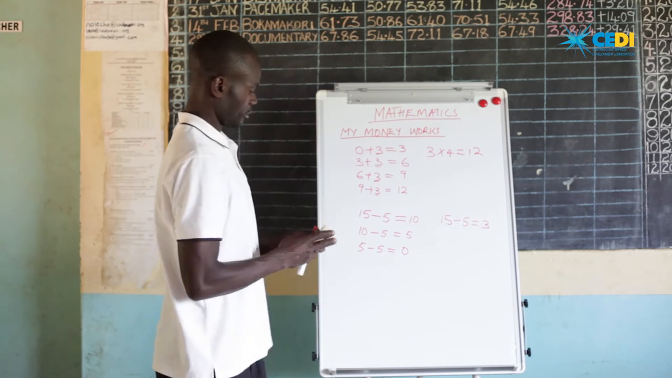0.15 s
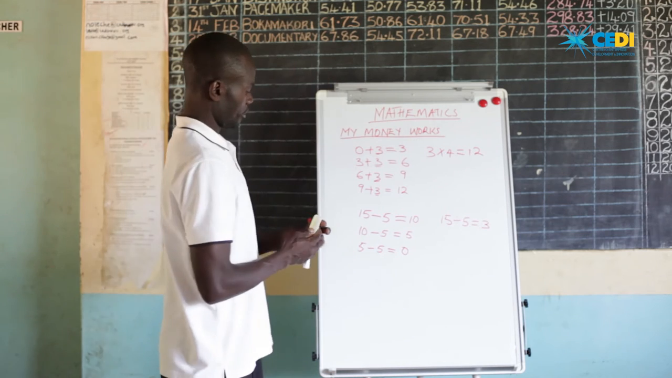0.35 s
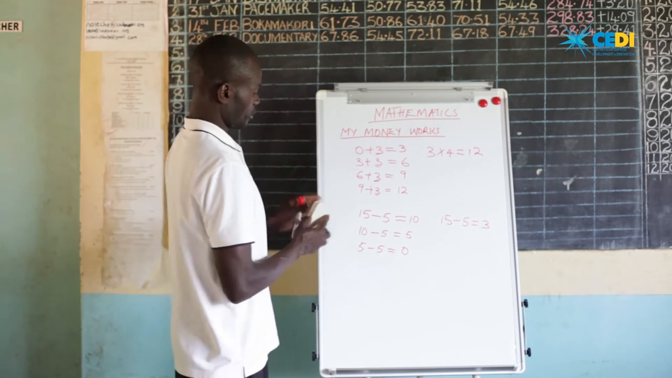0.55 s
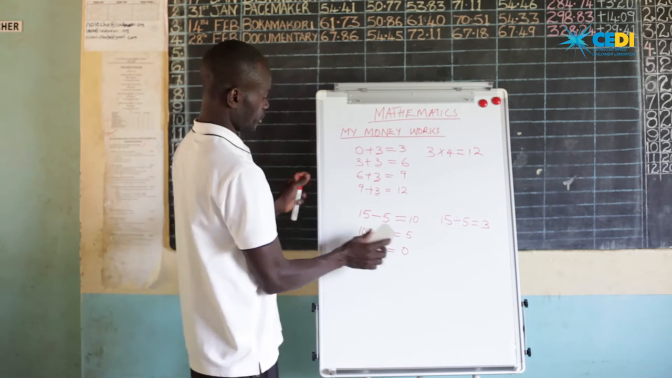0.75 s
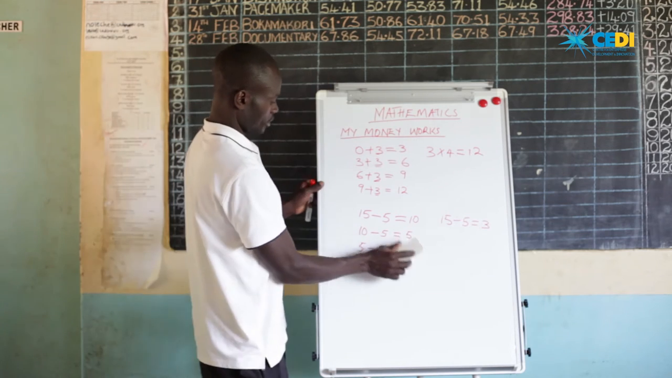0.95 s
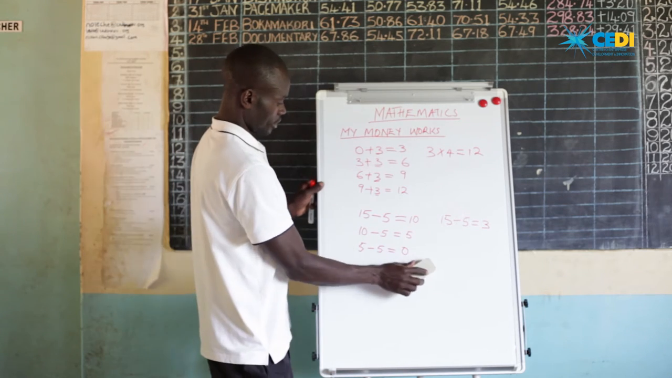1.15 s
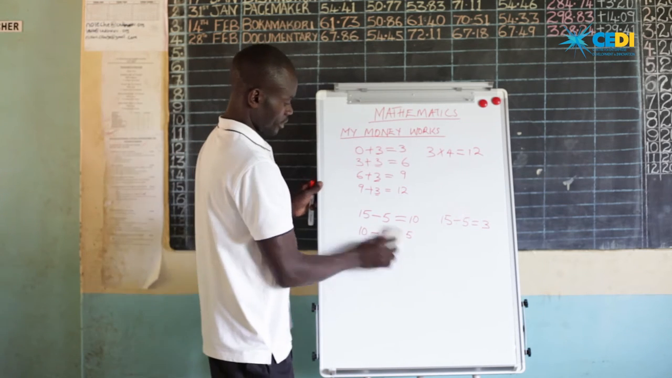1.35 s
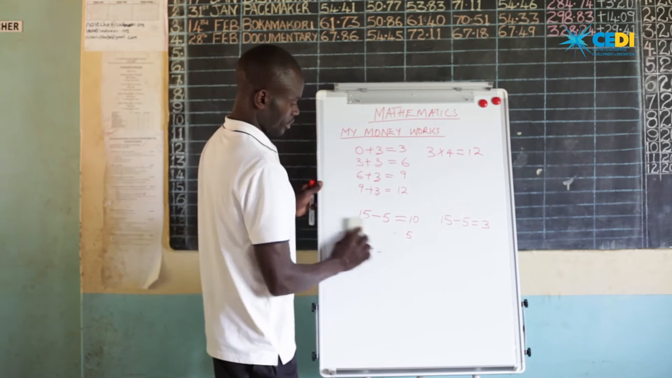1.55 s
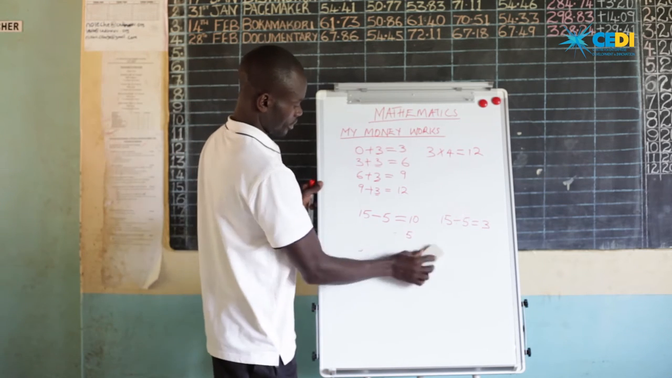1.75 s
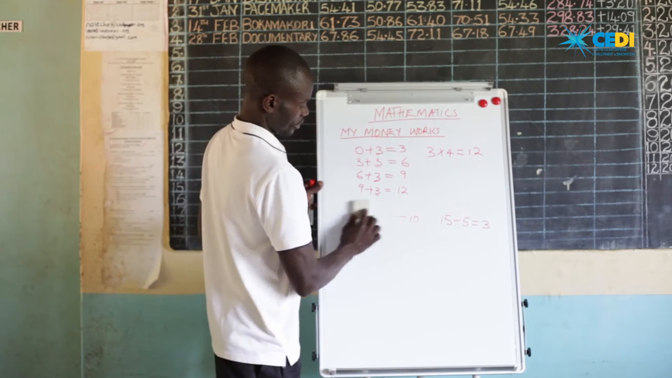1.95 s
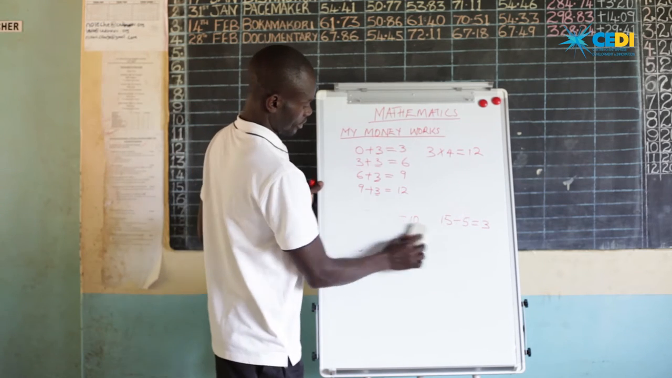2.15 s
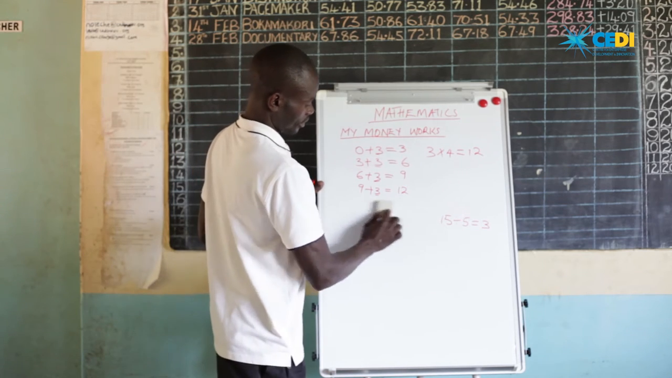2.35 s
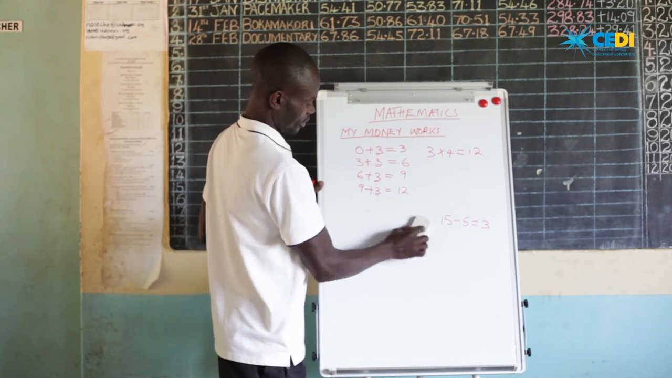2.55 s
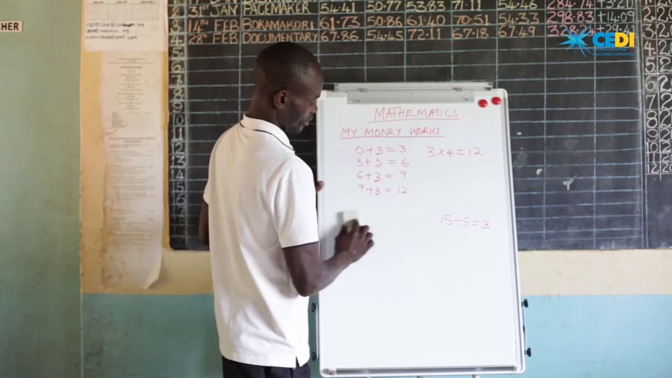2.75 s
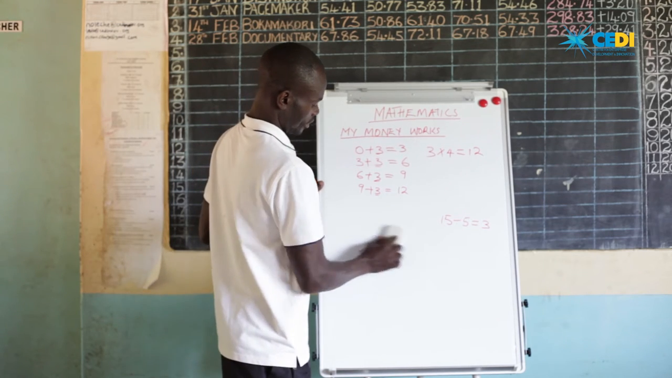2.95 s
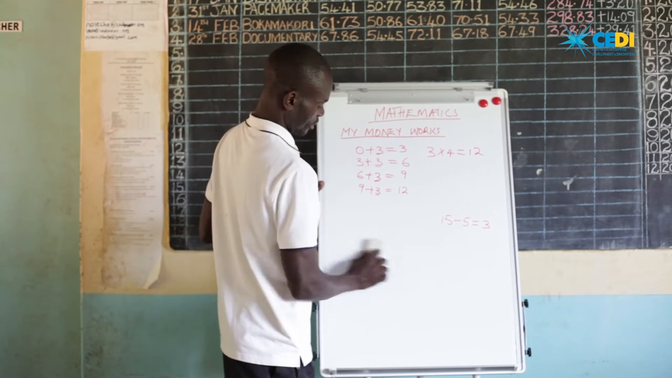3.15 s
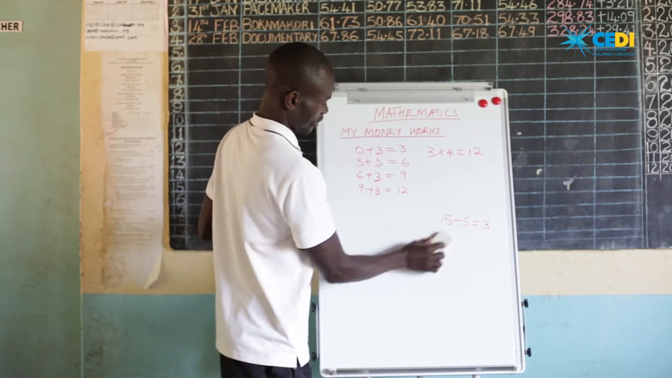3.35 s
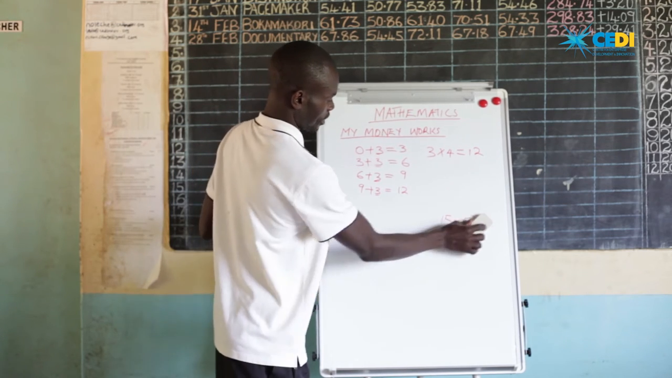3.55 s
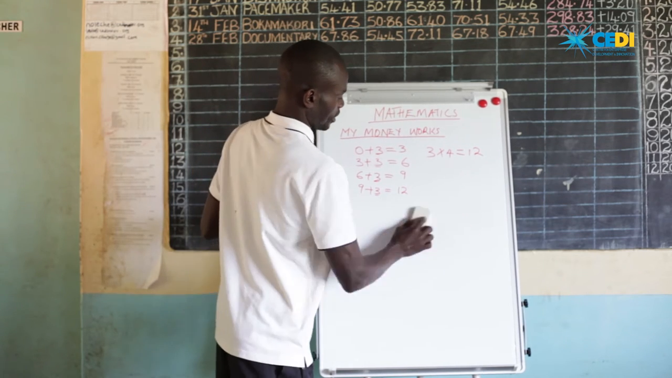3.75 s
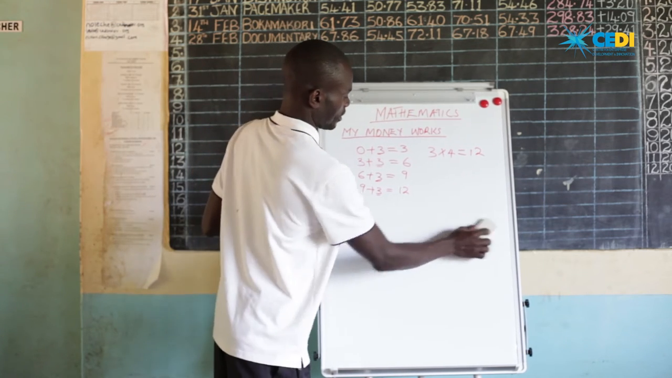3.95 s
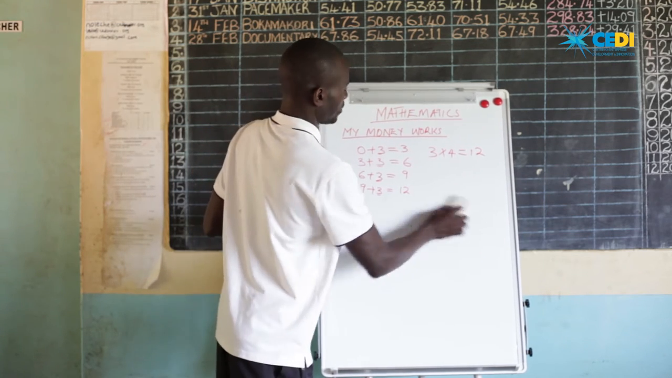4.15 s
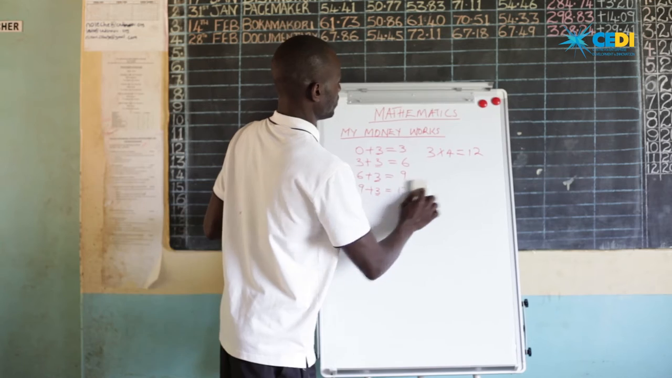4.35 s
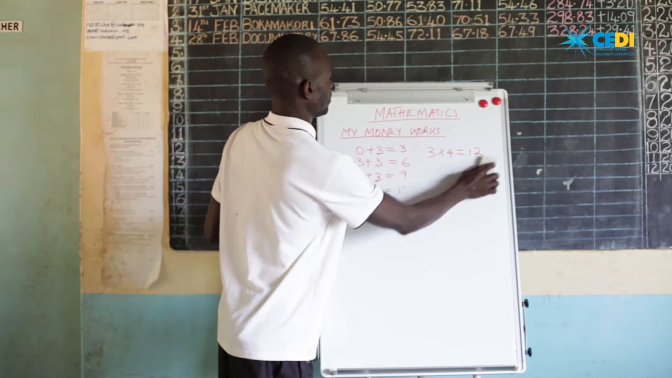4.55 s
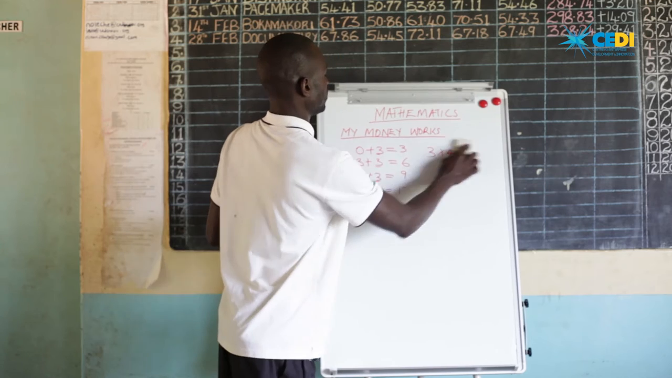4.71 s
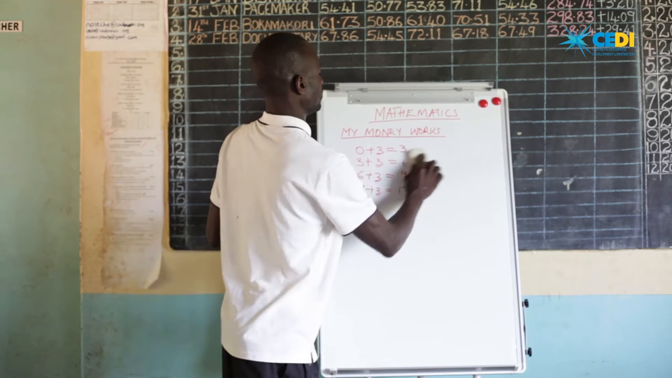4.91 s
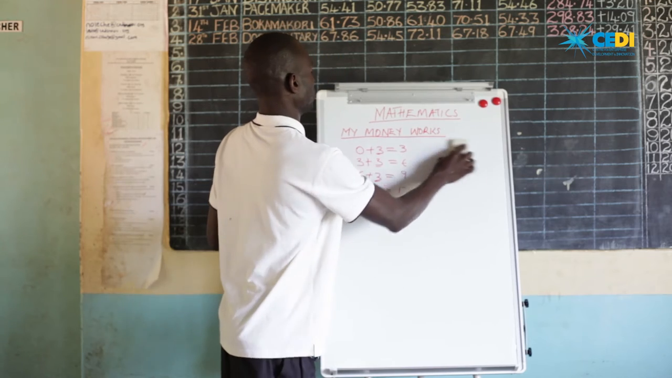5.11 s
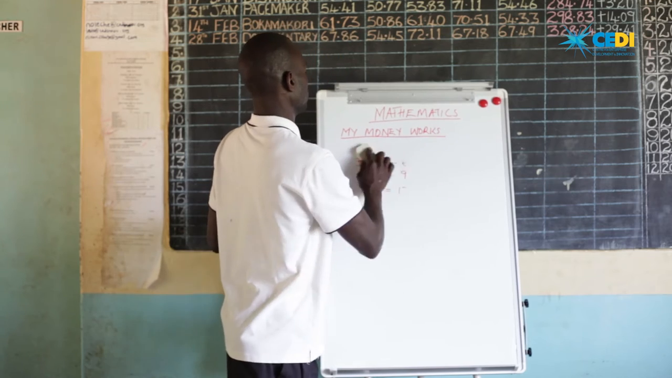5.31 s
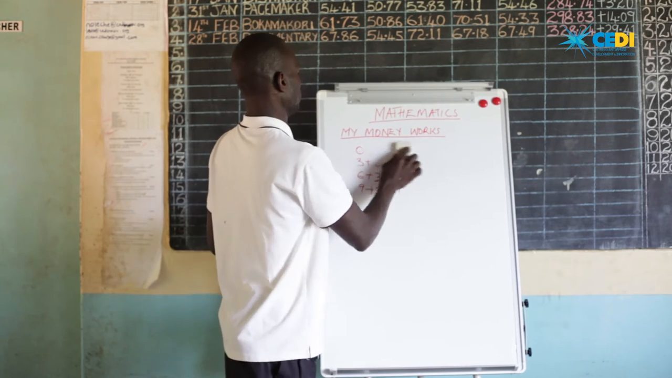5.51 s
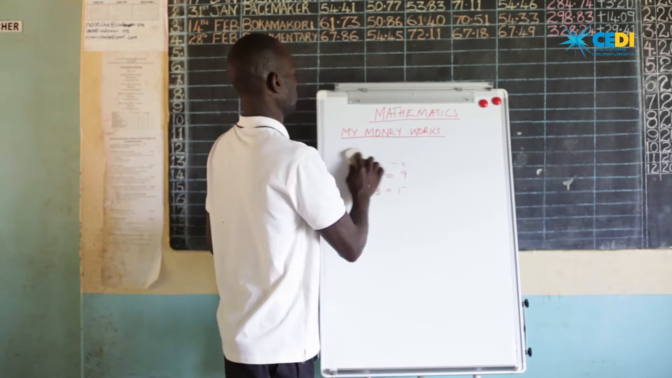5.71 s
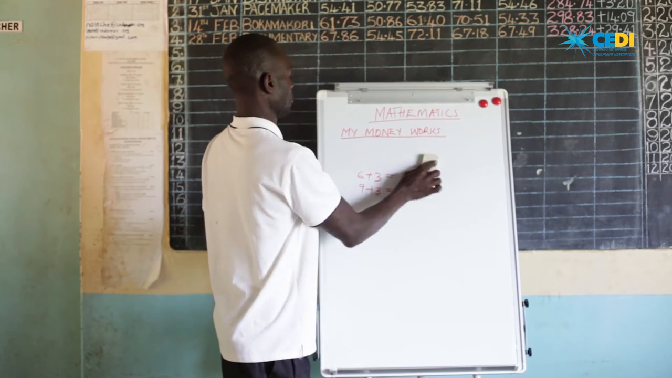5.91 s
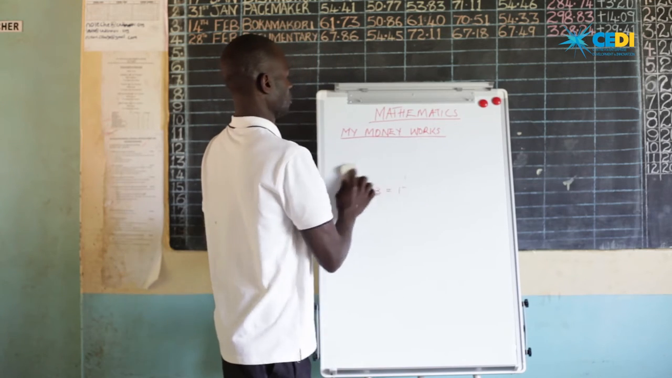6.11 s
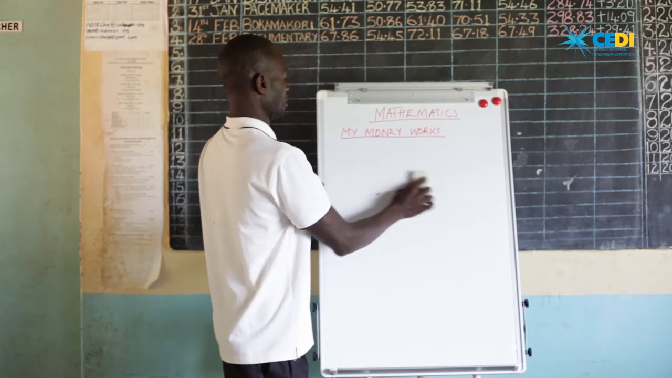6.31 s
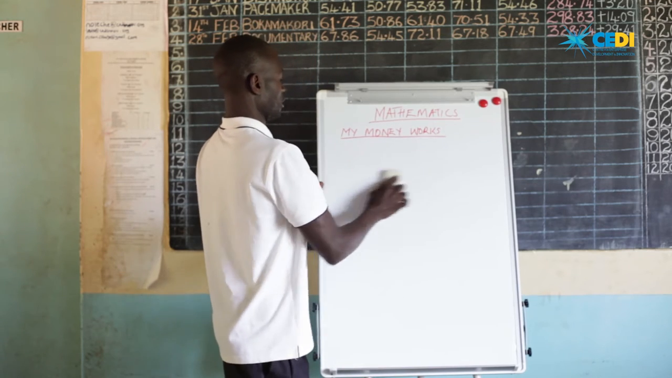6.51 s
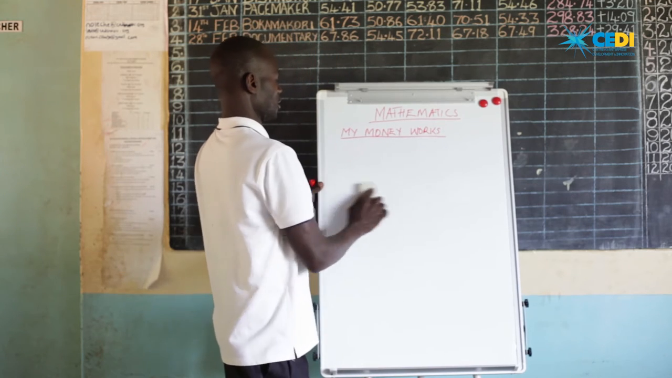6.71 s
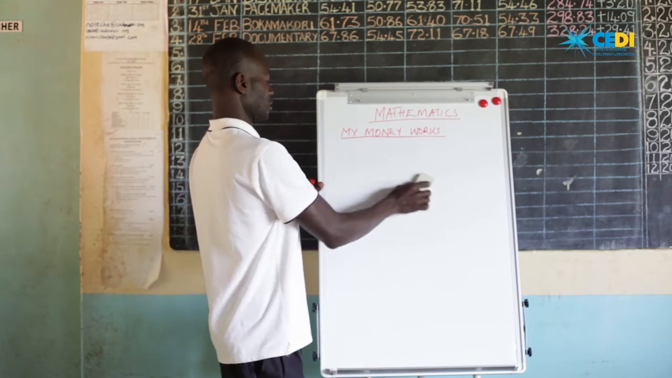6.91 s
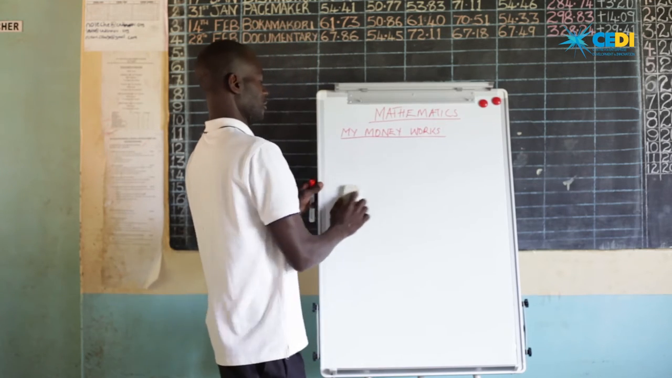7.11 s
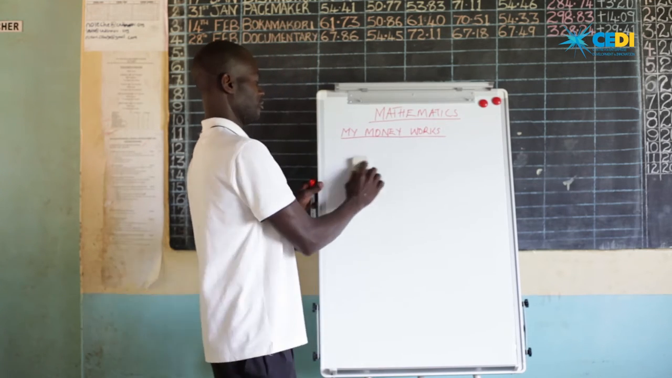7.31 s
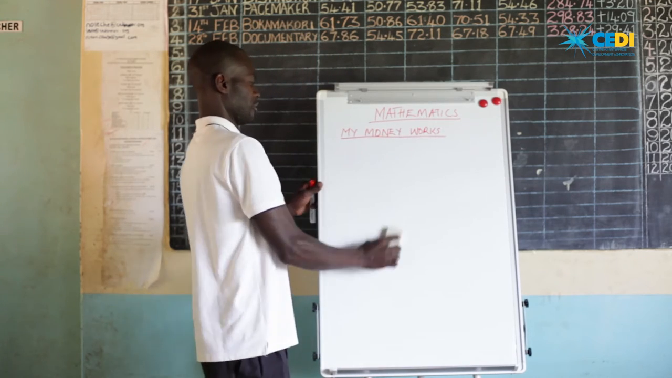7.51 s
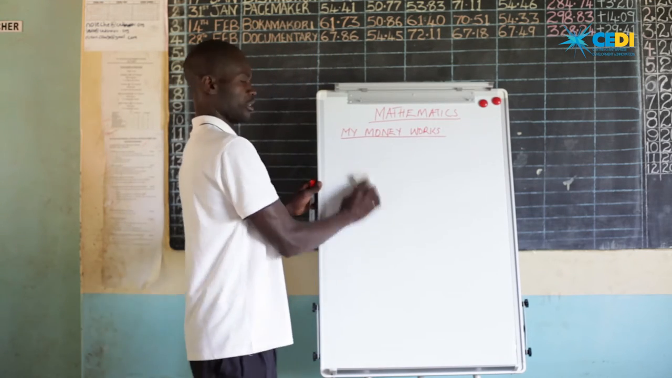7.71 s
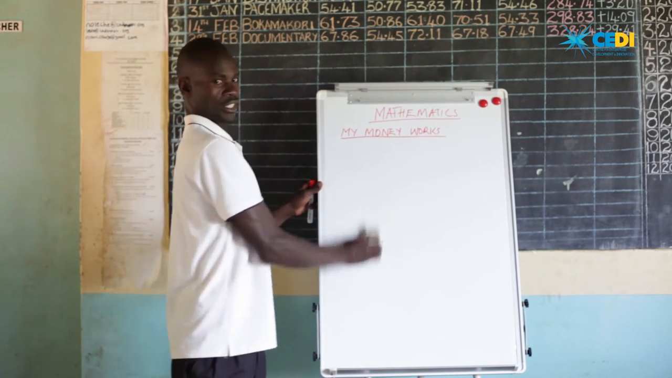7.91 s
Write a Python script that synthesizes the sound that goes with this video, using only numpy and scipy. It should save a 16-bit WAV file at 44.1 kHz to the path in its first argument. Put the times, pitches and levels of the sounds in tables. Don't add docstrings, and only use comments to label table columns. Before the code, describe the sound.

Close stereo view of a whiteboard being wiped. First there is only faint room rumble, hum, light rustling and one crisp plastic click. After about a second the pad goes to work, a steady dry hiss and scrape broken by irregular short squeaks, some clear and gliding, others hoarse. Dull easel thuds and knocks come with the shoves. Bare walls add a short live echo until the rubbing eases at the end.

```python
import sys
import numpy as np
from scipy import signal
from scipy.fft import rfft, irfft, next_fast_len
from scipy.io import wavfile
from scipy.ndimage import uniform_filter1d

SR = 44100
rng = np.random.default_rng(int(sys.argv[2]) if len(sys.argv) > 2 else 0)


def materialize(psi):
    bounded = np.clip(np.atleast_2d(psi).T, -1, 1)
    quanta = np.round(bounded * 32767).astype(np.int16)
    wavfile.write(sys.argv[1], SR, quanta)


def linear_from_db(decibels):
    return 10 ** (np.asarray(decibels, float) / 20)


N = 355874


def evened(x):
    return x / np.sqrt(np.mean(x ** 2) + 1e-20)


def smooth_twice(x, first, second):
    return evened(uniform_filter1d(uniform_filter1d(x, first), second))


def read(points, hz):
    f, value = np.transpose(points)
    return np.interp(np.log(hz + 1), np.log(f + 1), value)


def follow(rows, column):
    return np.interp(np.arange(N) / SR, [r[0] for r in rows], [r[column] for r in rows])


def add(mix, s, sound):
    part = mix[round(s * SR):][:len(sound)]
    part += sound[:len(part)]


def shape(x, gain):
    size = next_fast_len(N)
    return irfft(rfft(x, size) * gain(np.fft.rfftfreq(size, 1 / SR)), size)[..., :N]


def swells(s, db, rise_db_s, fall_db_s, idle_db):
    t = np.arange(0, N, 64) / SR
    late = t[:, None] - s
    peaks = linear_from_db(db - np.maximum(-late * rise_db_s, late * fall_db_s))
    gain = np.sqrt((peaks ** 2).sum(1) + linear_from_db(idle_db) ** 2)
    return np.interp(np.arange(N) / SR, t, gain)


# f/Hz, likeness [0 to 1]
LIKENESS = [(40, .8), (125, .75), (300, .86), (700, .75), (2400, .8), (7000, .86), (10000, .74),
            (14000, .25)]


def noise(spectrum, patchy_db):
    frames, hz = N // 256 + 5, np.fft.rfftfreq(1024, 1 / SR)
    a, b, c, d, patches = rng.standard_normal((frames, 513, 5)).T
    patches = evened(uniform_filter1d(uniform_filter1d(patches, 10, 0), 10, 1))
    same = read(LIKENESS, hz)[:, None]
    left = a + 1j * b
    right = same * left + np.sqrt(1 - same ** 2) * (c + 1j * d)
    z = np.array([left, right]) * linear_from_db(read(spectrum, hz)[:, None] + patchy_db * patches)
    return evened(signal.istft(z, nperseg=1024, noverlap=768)[1][:, :N])


# f/Hz, level/dB [per Hz]
QUIET_ROOM = [(12, -32), (20, 10.5), (59, 1.5), (119, -29), (275, -21), (354, -17), (601, -17.5),
              (1310, -27.5), (1830, -16.5), (4730, -23.5), (6430, -24), (10000, -29), (15700, -33)]


def quiet_room():
    return linear_from_db(-57.5) * noise(QUIET_ROOM, 1.8)


# f/Hz, level/dB [rms]
STEADY_TONES = [
    (50.5, -53),
    (74, -89),
    (113, -88),
    (360, -70),
]
# t/s, level/dB
HUM_DRIFT = [
    (0, -2.5),
    (2.5, -1.5),
    (5.2, -2),
    (8.07, -8),
]


def hum():
    t = np.arange(N) / SR
    wavers = smooth_twice(rng.standard_normal((len(STEADY_TONES), N)), 1200, 1200)
    total = np.zeros(N)
    for (hz, db), waver in zip(STEADY_TONES, wavers):
        total += np.sqrt(2) * linear_from_db(db + waver) * np.sin(2 * np.pi * hz * t + 0.17 * waver)
    return linear_from_db(follow(HUM_DRIFT, 1)) * total


# f/Hz, time to fall 60 dB [s]
ROOM_DECAY = [(250, 0.41), (1000, 0.64), (2000, 0.59), (5000, 0.49), (10000, 0.45)]


def room(x):
    hz, t, z = signal.stft(rng.standard_normal((3, SR)), SR, nperseg=256)
    tail = signal.istft(z * linear_from_db(-60 * t / read(ROOM_DECAY, hz)[:, None]), SR, nperseg=256)[1]
    onset = np.clip(np.arange(tail.shape[1]) / SR / 0.0056 - .5, 0, 1)
    tail = (tail[0] + 0.51 * tail[1:]) * onset
    return signal.fftconvolve(x[None], tail / np.linalg.norm(tail[0]), axes=1)[:, :N]


# f/Hz, level/dB [per Hz]
LEGS = [(32, -47), (55, 18), (70, 1.5), (124, 4), (172, -2), (194, -3), (260, -29.5), (340, -49),
        (570, -120)]
# f/Hz, level/dB [per Hz]
PANEL = [(120, -58), (200, -6), (323, -8), (362, 0), (491, -7.5), (635, -13.5), (754, -10.5), (981, -13.5),
         (1100, -12), (1430, -15), (2420, -120)]
# t/s, leg thud level/dB, panel knock level/dB
BUMPS = [(0, -60, -55.5), (.4, -53, -52), (.52, -72, -57), (.65, -65, -54.5), (.85, -59, -54.5),
         (1.08, -55, -56.5), (1.291, -51, -47.5), (1.49, -36.5, -40), (1.56, -44.5, -56.5),
         (2.09, -60, -54), (2.67, -62, -53.5), (2.94, -60, -57.5), (3.211, -48.5, -53), (3.42, -51.5, -62),
         (3.66, -54, -57), (3.77, -54, -67), (3.952, -37, -44.5), (4.101, -50, -54), (4.36, -48, -47.5),
         (4.5, -58, -69), (5.01, -59, -61), (5.66, -52.5, -64), (6.0, -64, -51), (6.14, -54.5, -71),
         (6.28, -55, -59), (6.6, -60, -69), (6.95, -78, -56.5), (7.099, -71, -61), (7.21, -59, -55),
         (7.26, -47.5, -59.5), (8.07, -55, -52.5)]


def easel():
    s, legs_db, panel_db = np.transpose(BUMPS)
    rise_db_s, legs_fall_db_s, panel_fall_db_s = 270, 115, 65.5
    legs = swells(s, legs_db, rise_db_s, legs_fall_db_s, -64.5) * noise(LEGS, 2.2)
    panel = swells(s, panel_db, rise_db_s, panel_fall_db_s, -66.5) * noise(PANEL, 2.86)
    return legs + panel


# t/s, peak level/dB, f/Hz
CLICKS = [
    (.4931, -18.5, 8000),
    (.5048, -30, 10000),
    (.7841, -43, 8500),
    (.8405, -44, 7500),
    (.9298, -44, 8600),
]


def pen_cap():
    cap = np.zeros(N)
    t = np.arange(300) / SR
    for s, db, hz in CLICKS:
        add(cap, s, -linear_from_db(db - 60 * t / 0.0011) * np.sin(2 * np.pi * hz * t + .8))
    return cap


# t/s, dip level/dB, half-width [s]
HALTS = [(1.85, 4, 0.047), (2.41, 2.5, 0.061), (2.69, 4, 0.065), (2.99, 3, 0.058), (3.63, -3, 0.02),
         (4.11, 5, 0.018), (4.35, -1, 0.039), (4.67, 11, 0.067), (4.93, 4, 0.0091), (5.21, 2, .04),
         (5.41, 4, 0.023), (5.56, 2, .015), (5.75, 7, 0.02), (5.98, 3, .015), (6.2, 2, 0.035),
         (6.47, 2, 0.018), (7.33, 3, 0.049), (7.62, 1, 0.033), (7.86, 2, 0.025)]


def pauses(share, lead_s):
    t, (s, dip_db, width) = np.arange(0, N, 64) / SR, np.transpose(HALTS)
    dips_db = (dip_db * np.exp(-((t[:, None] + lead_s - s) / width) ** 2)).sum(1)
    return linear_from_db(-share * np.interp(np.arange(N) / SR, t, dips_db))


def sheen(hiss):
    t = np.arange(0, N, 64) / SR
    s = np.array([row[0] for row in SQUEALS + HOARSE_SQUEALS + SQUEAKS + RASPS])
    lag_s, width_s = .018, 0.036
    slow = np.exp(-((t[:, None] - s - lag_s) / width_s) ** 2).max(1)
    slow = np.interp(np.arange(N) / SR, t, slow)
    top = shape(hiss, lambda hz: 1 / (1 + (10400 / (hz + 1)) ** 10))
    return hiss + (linear_from_db(1.5 - 6.5 * slow) - 1) * top


# f/Hz, level/dB [per Hz]
HISS = [(3530, -5.5), (6000, -2.5), (6450, -25), (7340, 3.5), (10000, 1), (12600, -3.5), (15700, -14.5)]
# f/Hz, level/dB [per Hz]
SCRAPE = [(620, -61), (1050, -16), (1410, -12), (1720, 2.5), (2000, -4), (2620, -2.5), (2920, -3),
          (4280, 1), (7000, -9), (9100, -23), (15400, -120)]
# t/s, effort level/dB
EFFORT = [(1.26, -39), (1.29, -0.5), (1.44, 3.5), (1.5, 5.5), (1.56, 1), (2.5, 2.5), (3.36, -0.5),
          (3.62, -3.5), (3.9, 2.5), (4.25, -2), (4.6, -0.5), (5.3, -1.5), (5.7, -2), (6.3, 0), (7.2, -2),
          (7.5, -3.5), (7.99, -5.5), (8.07, -15)]
# t/s, length/s, hiss level/dB, scrape level/dB
BRUSHES = [(0, 0.041, -59, -57), (0.075, 0.054, -52, -47.5), (0.177, 0.069, -66, -57),
           (0.429, 0.069, -52, -46.5), (0.502, 0.025, -40, -59), (0.538, 0.11, -54.5, -55),
           (.68, 0.23, -72, -58.5), (0.845, .08, -60.5, -71), (1.04, 0.04, -56.5, -68),
           (4.165, 0.056, -45, -39), (5.12, .04, -49, -55)]


def slide():
    effort_db = follow(EFFORT, 1)
    s, length, hiss_db, scrape_db = np.transpose(BRUSHES)
    fall = 9.5 / length
    rise = fall / 0.28
    hiss = linear_from_db(-52 + effort_db) * pauses(1, 0)
    scrape = linear_from_db(-45.5 + 1.42 * effort_db) * pauses(0.53, 0.005)
    hiss = np.hypot(hiss, swells(s, hiss_db, rise, fall, -67.5))
    scrape = np.hypot(scrape, swells(s, scrape_db, rise, fall, -79))
    return hiss * sheen(noise(HISS, .8)) + scrape * noise(SCRAPE, 1.8)


# f/Hz, level/dB
BOARD = [(600, -13), (1000, -8.5), (1400, 2), (2500, 6), (5500, 9.5), (6500, -6.5), (9500, 7), (14000, -17)]


def radiate(x):
    return shape(x, lambda hz: linear_from_db(read(BOARD, hz)))


def stick_slip(rows):
    s, *columns = np.transpose(rows)
    t = np.arange(s[0], s[-1], 1 / SR)
    level_db, hz, over_db, rough = (np.interp(t, s, c) for c in columns)
    level_db = uniform_filter1d(level_db, 200, mode="nearest")
    rough = np.clip(rough, 0, 1)
    chance = rng.standard_normal((3, 6000))[:, :len(t)]
    wobble = evened(uniform_filter1d(chance[0], 30))
    jerks = smooth_twice(chance[1], 70, 40)
    throb = smooth_twice(chance[2], 220, 150)
    grip = linear_from_db(6.5 * rough * jerks + 2.6 * throb)
    slip_hz = hz * (1 + 0.412 * rough ** 2 * wobble + .012 * throb)
    turns = 2 * np.pi * np.cumsum(slip_hz) / SR
    overtones = sum(linear_from_db(-8.5 * k) * np.cos((k + 2) * turns) for k in range(5))
    over_db = over_db - .04 * np.maximum(hz - 2000, 0)
    tone = np.sqrt(2) * (np.cos(turns) + linear_from_db(over_db) * overtones)
    fade = np.minimum(np.minimum(t - s[0], .5 * (s[-1] - t)) / 0.0041, 1)
    return s[0], linear_from_db(level_db - 4.5) * grip * tone * fade


# t/s, length/s, start f/Hz, end f/Hz, level/dB
CATCHES = [(1.28, 0.026, 1816, 940, -38), (1.299, 0.024, 2570, 2920, -37.5),
           (1.542, 0.022, 3040, 2840, -34), (1.591, 0.015, 2375, 1480, -25), (1.81, 0.046, 2103, 2063, -41),
           (2.065, 0.035, 2750, 2900, -38.5), (2.073, 0.025, 2404, 2434, -36),
           (5.534, 0.0084, 1674, 1380, -21.5), (6.2, 0.0168, 2344, 1770, -32.5),
           (2.453, 0.037, 2800, 2550, -35.5), (2.604, 0.017, 1906, 800, -26.5),
           (3.603, 0.095, 2200, 2005, -42), (3.829, 0.022, 2580, 1000, -25), (4.341, 0.017, 1983, 990, -34),
           (4.917, 0.022, 2303, 760, -30.5), (5.413, 0.015, 1310, 1140, -38),
           (5.539, 0.013, 1550, 1144, -22), (5.962, 0.011, 1706, 960, -23.5),
           (6.434, 0.012, 1420, 983, -17.5), (6.683, 0.015, 2620, 2440, -44),
           (6.93, 0.054, 1660, 1800, -54), (7.201, 0.024, 2033, 922, -31.5),
           (7.205, 0.011, 2710, 2870, -29.5)]


def catches(pad):
    over_db, rough = -8.5, 0.413
    for s, length, from_hz, to_hz, db in CATCHES:
        end = s + max(length, .005)
        add(pad, *stick_slip([(s, db, from_hz, over_db, rough), (end, db, to_hz, over_db, rough)]))


def squeal(s, length, db, hz, over_db, rough):
    high, low = hz * (1 + 0.016), hz * (1 - 0.016)
    end_db = db - 6 * length / 0.057
    return stick_slip([(s, db, high, over_db, rough),
                       (s + 0.0057, db, high, over_db, rough),
                       (s + length, end_db, low, over_db, rough)])


# t/s, length/s, level/dB, slip rate f/Hz, overtone level/dB
HOARSE_SQUEALS = [
    (3.855, 0.041, -26, 1704, -9.5),
    (5.989, 0.033, -26.5, 1700, -13),
    (6.426, 0.015, -22, 1464, -13),
    (7.189, 0.022, -28.5, 2288, -1.5),
    (5.753, 0.029, -27, 1580, -16.5),
    (6.214, 0.042, -26.5, 1692, -13),
]


def hoarse_squeals(pad):
    for row in HOARSE_SQUEALS:
        add(pad, *squeal(*row, rough=0.41))


# t/s, length/s, level/dB, slip rate f/Hz, overtone level/dB
SQUEALS = [(1.585, 0.055, -21.5, 1850, -17.5), (1.797, 0.11, -26, 1811, -21.5),
           (2.078, 0.021, -24, 1929, -20), (2.269, 0.067, -24.5, 1887, -13.5), (2.47, 0.039, -25, 1953, -8),
           (2.812, .027, -18, 1994, -11), (2.987, 0.031, -36.5, 1870, -31), (3.148, 0.021, -25, 2052, -9),
           (3.602, 0.057, -30.5, 1791, -20), (6.936, 0.0304, -29, 1760, -14.5),
           (6.958, 0.029, -27.5, 1894, -13.5), (7.63, 0.079, -25.5, 1830, -16.5),
           (7.837, 0.0091, -23.5, 1837, -27)]


def steady_squeals(pad):
    for row in SQUEALS:
        add(pad, *squeal(*row, rough=0.092))


def turn(s, length, db, from_hz, turn_hz, rough):
    end_hz = turn_hz + 0.14 * (from_hz - turn_hz)
    return stick_slip([(s, db - 2.5, from_hz, -19.5, rough),
                       (s + .65 * length, db, turn_hz, -8.5, rough),
                       (s + length, db + 1.5, end_hz, -6.5, rough)])


# t/s, length/s, level/dB, start f/Hz, turn f/Hz
RASPS = [
    (1.29, 0.0313, -31.5, 2025, 2077),
    (1.545, .04, -31, 2048, 1998),
    (4.077, 0.057, -39, 2030, 1717),
    (4.347, 0.054, -38.5, 1670, 1678),
    (4.942, 0.024, -31, 1968, 1728),
    (5.396, 0.024, -37.5, 1967, 1310),
    (5.551, 0.043, -35, 1395, 1661),
    (6.461, 0.0317, -33.5, 1503, 1747),
    (7.212, 0.036, -32, 1900, 1784),
    (7.834, 0.051, -44.5, 1803, 1729),
]


def rasps(pad):
    for row in RASPS:
        add(pad, *turn(*row, rough=0.58))


# t/s, length/s, level/dB, start f/Hz, turn f/Hz
SQUEAKS = [
    (2.449, 0.029, -21.5, 2344, 1952),
    (2.602, 0.032, -28, 1900, 1794),
    (2.798, .018, -23.5, 2513, 2016),
    (3.134, 0.02, -24.5, 2362, 2114),
    (5.104, 0.031, -26.5, 1801, 1550),
    (5.126, 0.024, -26.5, 1520, 1766),
    (5.734, .028, -39, 2050, 1510),
    (6.691, 0.05, -27.5, 2583, 1680),
]


def squeaks(pad):
    for row in SQUEAKS:
        add(pad, *turn(*row, rough=0.32))


def scene():
    rub = slide()
    rock = easel()
    still = quiet_room() + hum()
    pad = np.zeros(N)
    for voice in (steady_squeals, hoarse_squeals, squeaks, rasps, catches):
        voice(pad)
    near = radiate(pad) + pen_cap()
    direct = near * linear_from_db([[.5], [-.5]])
    return direct + linear_from_db(-2.0) * room(near) + rub + rock + still


def band_limit(x):
    return signal.sosfilt(signal.butter(12, 16540, fs=SR, output="sos"), x)


def record(dry):
    mix = shape(dry, lambda hz: hz < 15780)
    return band_limit(mix)


dry = scene()
out = record(dry)
materialize(out)
```